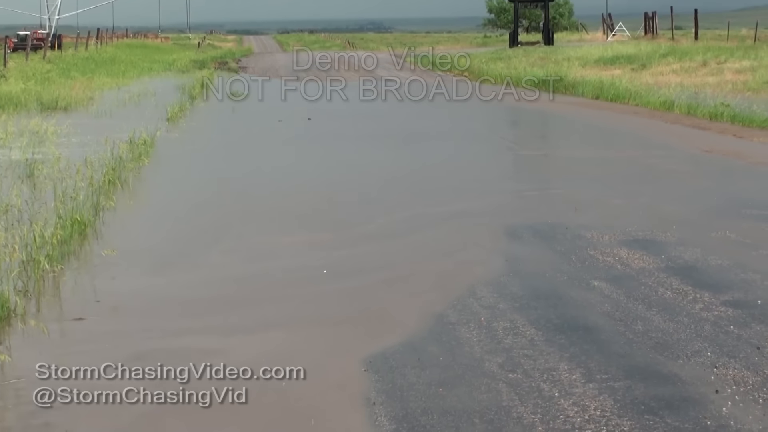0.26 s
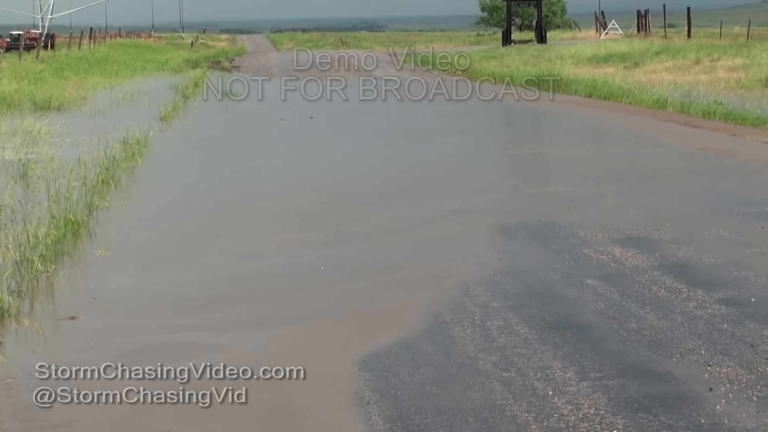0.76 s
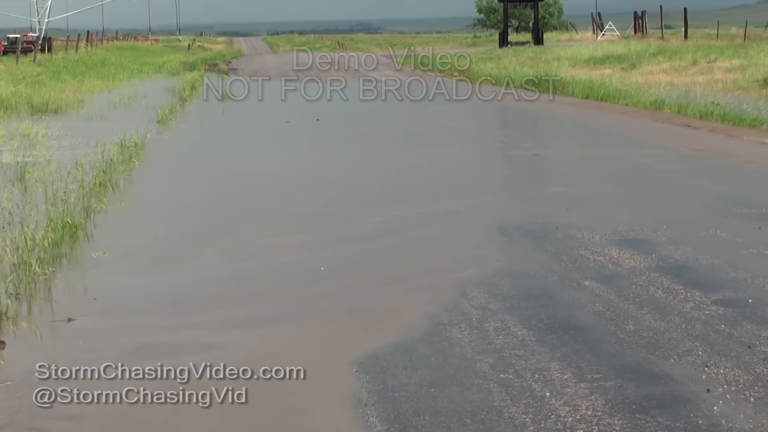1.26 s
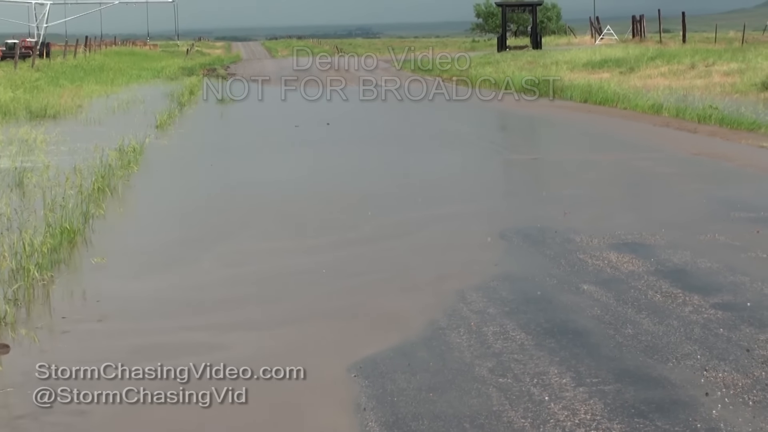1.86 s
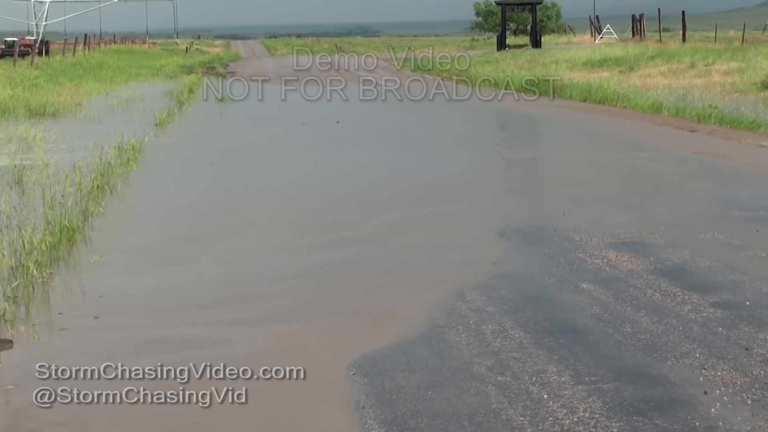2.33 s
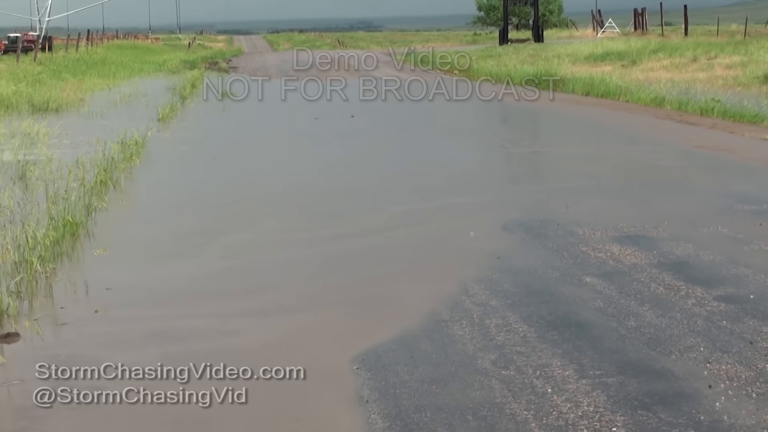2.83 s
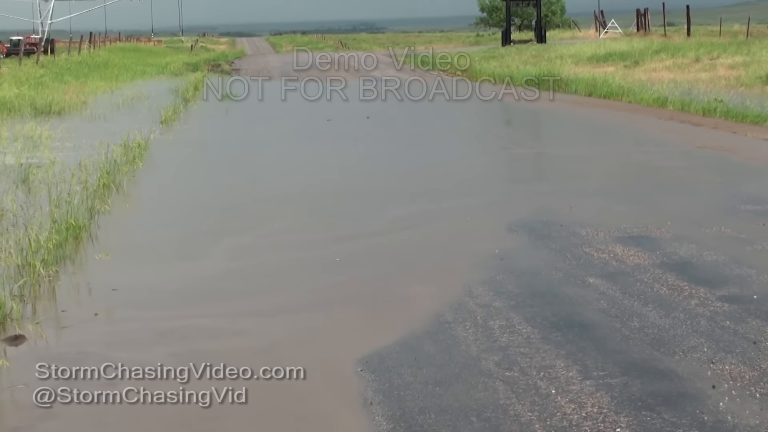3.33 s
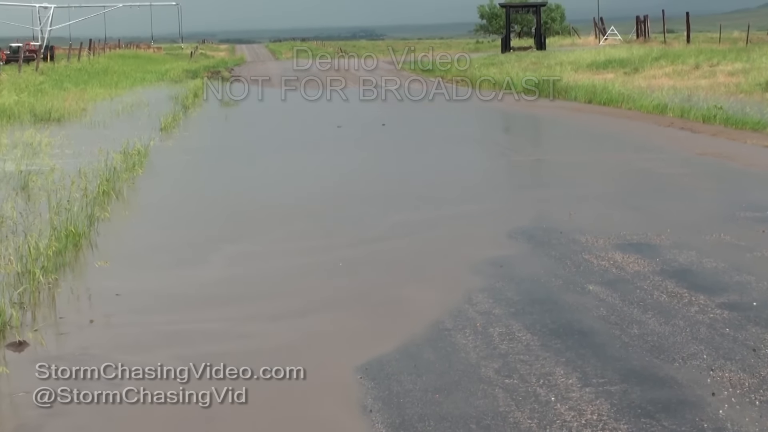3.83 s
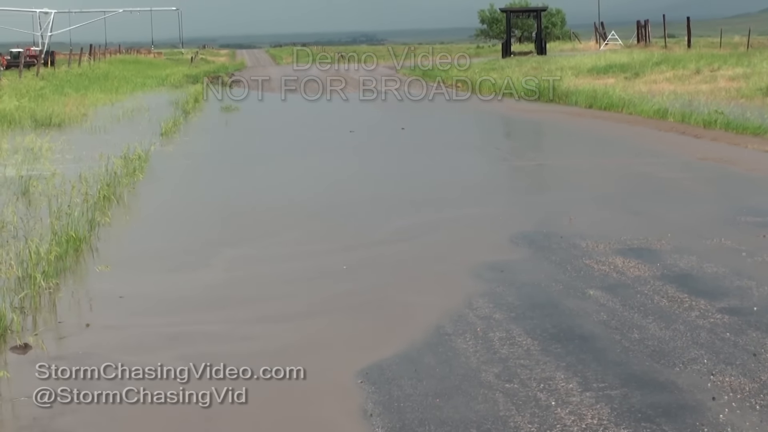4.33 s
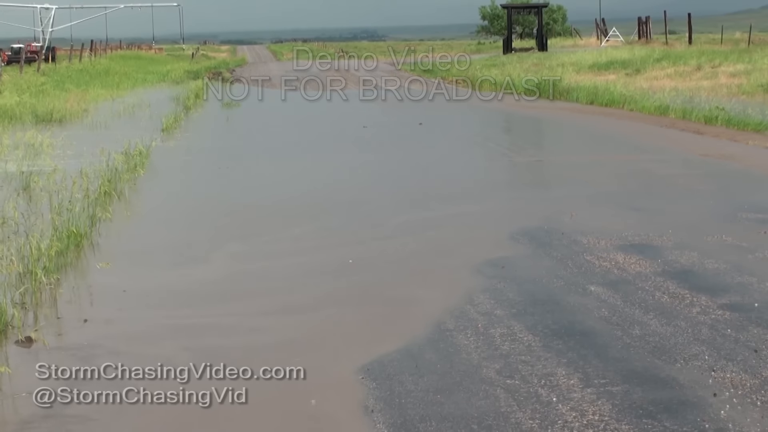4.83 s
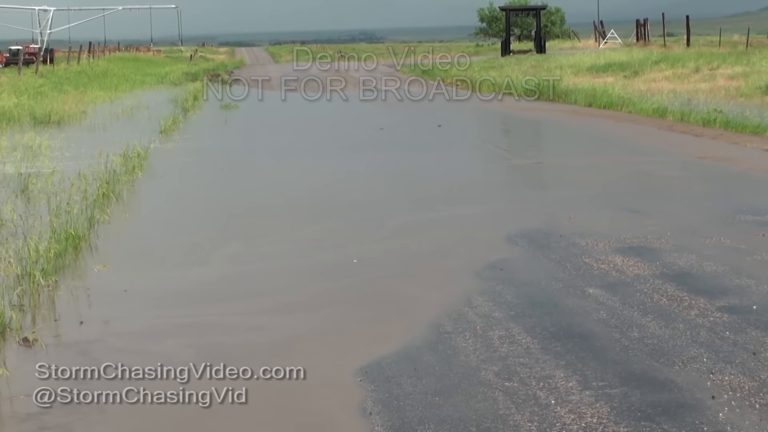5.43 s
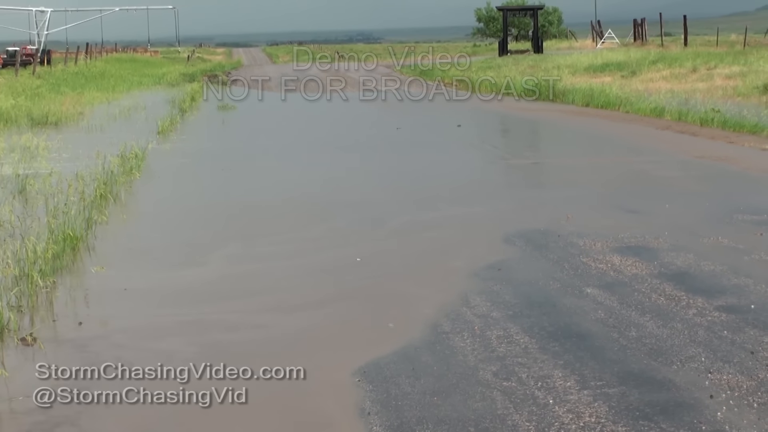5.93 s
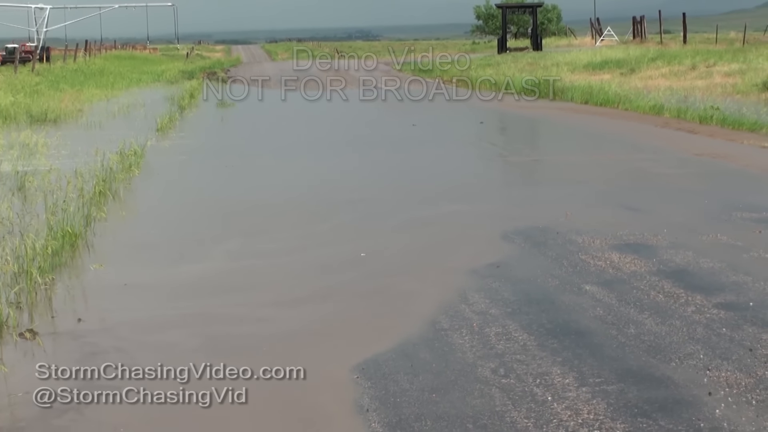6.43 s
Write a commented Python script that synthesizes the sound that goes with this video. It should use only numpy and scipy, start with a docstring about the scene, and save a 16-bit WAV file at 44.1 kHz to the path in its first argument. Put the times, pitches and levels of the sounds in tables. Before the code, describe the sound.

Low, muffled thunder rolls and fades, then cracks up louder in a cluster of deep thumps, over soft hiss, faint drips and a far bird.

```python
"""Distant thunder rolls over a flooded country road: shock waves from many bends of the lightning channel
arrive in overlapping swarms, dulled by kilometres of air, deep and bright parts from different sides.
Noise and random impulses, shaped in six registers, make the roll; dying sines make the claps that stand out.
A songbird of gliding sines sings far off, drops tick faintly on the water as short sine bursts,
the recorder's housing clicks twice as a set of ringing modes, and filtered noise hisses throughout."""
import sys
import numpy as np
from scipy import signal
from scipy.fft import rfft, irfft, next_fast_len
from scipy.io import wavfile
from scipy.ndimage import uniform_filter1d

SR = 44100
rng = np.random.default_rng(int(sys.argv[2]) if len(sys.argv) > 2 else 0)


def unload_wav(signal):
    """Save mono or channel-first audio to the path in sys.argv[1] as 16-bit WAV at rate SR, clipped to [-1, 1]."""
    wavfile.write(
        sys.argv[1],
        SR,
        np.round(np.clip(np.atleast_2d(signal).T, -1, 1) * 32767).astype(np.int16),
    )


N = 294499

# centres of the six thunder registers: (frequency [Hz])
REGISTERS_HZ = [58, 125, 235, 440, 780, 1300]


def from_db(db):
    """Level as a logarithm of amplitude: 20 dB is a factor of ten."""
    return 10 ** (np.asarray(db) / 20)


def rms_one(x):
    """Normalisation to unit mean power."""
    return x / np.sqrt(np.mean(x ** 2) + 1e-20)


def at_hz(points, hz):
    """Interpolation along a logarithmic frequency axis, on which octaves are equally wide."""
    corner_hz, values = np.array(points).T
    return np.interp(np.log(hz), np.log(corner_hz), values)


def coloured(x, gain_of_hz):
    """Linear filtering: each spectral component is multiplied by the gain at its frequency."""
    size = next_fast_len(N)
    hz = np.maximum(np.arange(size // 2 + 1) * SR / size, 1)
    return irfft(rfft(x, size) * gain_of_hz(hz), size)[..., :N]


def sides(x, pan_db):
    """Localisation by level difference: left exceeds right by pan_db."""
    return x * from_db(np.array([[.5], [-.5]]) * pan_db)


def burst(out_len, hz, t60):
    """Free damped oscillation: a sine whose level falls 60 dB in t60 seconds."""
    t = np.arange(out_len) / SR
    return np.sin(2 * np.pi * hz * t) * from_db(-60 * t / t60)


def add(out, s, x):
    """Superposition: sound pressures sum, here from s seconds on."""
    i = round(s * SR)
    out[..., i:i + x.shape[-1]] += x[..., :N - i]


def air():
    """Partly coherent noise: far running water and microphone hiss, as a common and an opposed part."""
    # hiss spectrum: (frequency [Hz], relative level [dB])
    hiss_spectrum = [(880, -10), (1500, -6), (1910, -5), (2150, -3.5), (2730, -7.5), (4480, -11.5),
                     (9610, -18), (11900, -19), (13500, -8)]
    # share of power common to both sides: (frequency [Hz], left-right likeness [-1 to 1])
    likeness = [(1200, 0.24), (2200, 0.067), (4000, .4), (9000, .5), (11500, 0.89)]
    level_db, top_hz = -59.5, 14070   # level of the common part before the top is cut
    mid, side = rng.standard_normal((2, N))
    mid = coloured(mid, lambda hz: from_db(at_hz(hiss_spectrum, hz)) * np.sqrt(1 + at_hz(likeness, hz)))
    side = coloured(side, lambda hz: from_db(at_hz(hiss_spectrum, hz)) * np.sqrt(1 - at_hz(likeness, hz)))
    hiss = from_db(level_db) * (mid + side * [[1], [-1]]) / np.std(mid)
    return signal.sosfilt(signal.cheby2(12, 60, top_hz, fs=SR, output="sos"), hiss)


def bird():
    """Frequency modulation: gliding whistles with soft ends, fluttering in moving air, then echoed."""
    # notes: (time [s], length [s], first pitch [Hz], last pitch [Hz], level before flutter and echoes [dB])
    notes = [(1.077, 0.013, 2320, 2200, -61.5), (1.519, .02, 2300, 2500, -65),
             (3.018, .03, 2550, 2520, -70), (3.462, 0.029, 2354, 2350, -65),
             (4.968, 0.033, 3700, 3700, -75), (5.051, 0.056, 3590, 3554, -68.5),
             (5.34, .02, 2390, 2300, -70), (5.375, .02, 5000, 5070, -67.5),
             (5.49, 0.032, 4700, 4400, -65.5), (5.54, .025, 5100, 4800, -70),
             (5.545, .012, 3240, 2920, -67), (5.678, 0.023, 5450, 5200, -76), (5.73, .02, 4250, 4300, -69),
             (5.745, 0.027, 4800, 3700, -69), (5.77, 0.012, 3650, 3130, -61),
             (5.776, 0.016, 3070, 2730, -63), (5.802, 0.049, 3170, 3100, -60),
             (6.002, 0.016, 2270, 2280, -66), (6.026, .018, 4180, 3930, -66),
             (6.05, 0.018, 3270, 3300, -68), (6.114, 0.018, 2580, 2640, -68),
             (6.127, 0.016, 2900, 3330, -68), (6.16, .025, 2210, 2250, -63), (6.19, .035, 2380, 2260, -63),
             (6.195, .14, 2330, 2220, -72)]
    # reflections off the ground and slopes: (delay [s], level [dB])
    echoes = [(.011, -6), (.027, -20), (.048, -17.5)]
    flutter_db, flutter_hz = 1.5, 120   # rms depth, upper rate
    song = np.zeros(N)
    for s, length, first_hz, last_hz, db in notes:
        n = int(length * SR)
        phase = 2 * np.pi * np.cumsum(np.linspace(first_hz, last_hz, n)) / SR
        soft_ends = np.sin(np.linspace(0, np.pi, n)) ** 0.47
        add(song, s, from_db(db) * np.sqrt(2) * np.sin(phase) * soft_ends)
    slow = signal.butter(2, flutter_hz, fs=SR, output="sos")
    flutter = rms_one(signal.sosfilt(slow, rng.standard_normal(N)))
    song = song * from_db(flutter_db * flutter)
    return song + sum(from_db(db) * np.roll(song, int(lag * SR)) for lag, db in echoes)


def drops():
    """Damped oscillation: each drop is a soft-edged tick of a few cycles; faint ones fall at random."""
    # clear drops: (time [s], level before rise and decay [dB], pitch [Hz])
    clear = [(0.322, -47, 5300), (0.368, -51, 5200), (1.13, -46, 5800), (3.03, -49, 9000),
             (3.172, -46, 5760), (3.327, -46, 8500), (3.883, -48, 4350), (4.055, -49, 5300),
             (5.132, -43.5, 5360), (5.93, -46.5, 4200), (6.296, -51, 3100), (6.469, -39, 11500),
             (6.62, -47, 2700)]
    faint_per_s, faint_db, faint_spread_db = 25, -56, 2.2   # lowest level, mean excess above it
    chance = rng.random((int(faint_per_s * N / SR), 3))
    faint = [(s * N / SR, faint_db - faint_spread_db * np.log(size), 1800 * 3 ** pitch)
             for s, size, pitch in chance]
    out = np.zeros(N)
    for s, db, hz in [*clear, *faint]:
        rise = 1 - np.exp(-np.arange(400) / SR * hz * 3.0)
        add(out, s, from_db(db) * rise * burst(400, hz, 12.0 / hz))
    return out


def housing():
    """Modal resonance: each click rings the same plastic modes, dull or bright, under a snap of noise."""
    # clicks: (time [s], peak level of the modes [dB], factor on ring times [0-1],
    #          brightness [dB/octave], left minus right [dB])
    clicks = [(4.7134, -14, 1.0, 1.5, -2.5), (4.7142, -21, 1, 1.5, 5), (4.7155, -25.5, 1, -16.5, 8.5),
              (6.1017, -44.5, 0.3, 20, .3), (6.1047, -23.5, 0.37, 11, 2.5)]
    # plastic modes: (frequency [Hz], relative level [dB], full ring time to -60 dB [s])
    plastic_modes = [(695, -26, 0.023), (1806, -17, 0.033), (2630, -15, 0.015), (3600, -26, .01),
                     (4610, -6, 0.0076), (5390, 3, 0.0082), (6950, 6, 0.0063), (8660, -6.5, 0.024),
                     (9040, -1.5, 0.014), (10500, 3, 0.0016), (11400, -5, 0.0097), (12500, -3.5, 0.0038),
                     (13500, -17, .007), (14290, -11, 0.0076)]
    snap_db, snap_t60_s = -10, 0.012   # relative to the modes' peak; decay at full ring
    out, t = np.zeros((2, N)), np.arange(SR // 10) / SR
    for s, db, ring, tilt_db, pan_db in clicks:
        modes = np.zeros(len(t))
        for k, (hz, level_db, t60) in enumerate(plastic_modes):
            height = from_db(level_db + tilt_db * np.log2(hz / 8000))
            modes += (-1) ** k * height * burst(len(t), hz, ring * t60)
        edge_hz = np.clip(1400 * 2 ** (tilt_db / 4), 300, 12000)   # a bright click has a thin snap
        high_pass = signal.butter(2, edge_hz, "high", fs=SR, output="sos")
        snap = signal.sosfilt(high_pass, rng.standard_normal(len(t)))
        snap = from_db(snap_db - 60 * t / (ring * snap_t60_s)) * snap
        add(out, s, sides(from_db(db) * (modes / np.max(np.abs(modes)) + snap), pan_db))
    return out


def claps():
    """Damped oscillation: a strong shock through the ground echo gives a few quickly dying swings."""
    # claps that stand out of the roll: (time [s], level before rise and decay [dB], pitch [Hz],
    #                                    clear swings [count], left minus right [dB])
    strong_shocks = [(0.681, -15, 149, 6.5, -9), (1.576, -31, 800, 9.6, 8), (1.661, -24, 147, 6.2, -16),
                     (1.924, -25, 400, 16, 11), (1.938, -28.5, 770, 14, 10), (2.302, -16, 212, 4.1, 6),
                     (2.304, -22.5, 510, 4.5, 13), (2.581, -17.5, 129, 5.7, -4), (2.633, -12, 123, 6.0, -5),
                     (2.794, -27, 560, 14, 8), (2.807, -22, 180, 7.2, 9), (4.734, -5, 189, 8.1, 1),
                     (4.735, -22, 68, 3.5, -3), (4.863, -7, 239, 6.5, 3), (4.919, -7, 170, 5.4, 1),
                     (5.066, -6.5, 236, 3.3, 1.5), (5.138, -7, 242, 7.6, 4), (5.277, -16, 170, 5, 1),
                     (5.486, -14.5, 300, 5.9, 6)]
    out = np.zeros((2, N))
    for s, db, hz, swings, pan_db in strong_shocks:
        rise = 1 - np.exp(-np.arange(SR // 10) / SR * hz * 4)
        t60 = 1.8 * swings / hz   # silence comes well after the last clear swing
        add(out, s, sides(from_db(db) * rise * burst(SR // 10, hz, t60), pan_db))
    return out


def peals():
    """Incoherent addition: powers of rising, holding and fading peals sum to a gain per register and side."""
    # one peal per stretch of the channel: (time [s], hold [s], level [dB], fade, sign ignored [dB/s],
    #     brightness [dB/octave], left minus right [dB], narrowness [dB/octave squared])
    stretches = [(-0.053, 0.2, -46.1, 6.0, -13.0, -2.6, -0.1), (-0.05, 2.911, -39.8, 6, 11.8, -5.6, 4.7),
                 (0.463, 0.025, -37.5, 109.0, -10.1, -5.5, 0.5),
                 (0.615, 0.245, -30.7, 196.0, -6.5, -5.5, -0.7),
                 (0.822, 0.285, -28.5, 13.0, -3.4, -7.1, -0.5),
                 (0.963, 0.122, -31.8, 81.0, -10.2, -3.9, 1.3), (1.059, 0.02, -49.2, 2.0, 12.9, 2.0, 0.5),
                 (1.251, 0.185, -36.7, 52.0, -11.5, -4.1, 0.4),
                 (1.575, 0.139, -31.9, 78.0, -8.5, -5.0, -0.9), (1.77, 0.017, -34.4, 13.0, -7.4, -4.5, 0.6),
                 (1.883, 0.007, -33.1, 209.0, 10.4, 5.5, 0.5), (1.986, 0.016, -40.6, 61.0, 9.1, 1.3, -0.6),
                 (2.178, 0.083, -34.7, 51.0, 5.0, 3.5, -0.8), (2.556, 0.112, -31.3, 85.0, -12.9, -4.3, 3.7),
                 (2.747, 0.009, -29.7, 185.0, 7.2, 4.8, 0.2), (2.776, 0.045, -29.9, 26.0, -5.4, -3.9, -1.4),
                 (2.926, 0.015, -33.7, 170.0, 9.6, 5.0, 1.4), (3.039, 0.4, -37.7, 60.0, 2.1, -8.8, 0.5),
                 (3.173, 0.047, -41.3, 29.0, 6.5, 8.8, 0.2), (3.396, 0.0, -30, 136.0, 1.6, 1.2, -0.9),
                 (3.782, 0.008, -39.4, 26.0, 3.0, -0.2, -0.7), (3.971, 0.053, -41.9, 57.0, -10.2, -2.5, 2),
                 (4.315, 0.669, -39.7, -1, 0.9, -0.9, -1.7), (4.722, 0.0, -22.9, 69.0, -2.4, 1.1, -1.0),
                 (4.868, 0.01, -23.2, 41.0, -2.6, 0.4, 0.1), (4.901, 0.05, -35.4, 5.0, 7.6, 2.3, -0.5),
                 (5.023, 0.087, -23.1, 274.0, -1.5, 0.6, -0.3),
                 (5.209, 0.023, -24.5, 301.0, -3.3, -0.1, -0.7),
                 (5.423, 0.093, -28.8, 60.0, 3.2, 2.3, -1.0), (5.722, 0.01, -44.7, 92.0, -10.7, -0.4, -1.0),
                 (5.882, 0.207, -31.2, 54.0, 4.5, 2.6, -0.3),
                 (6.051, 0.043, -43.2, 120.0, -12.5, -1.5, -0.4),
                 (6.221, 0.05, -31.5, 105.0, 5.0, 3.8, -0.5), (6.498, 0.2, -37.4, 60.0, 3.2, 2.6, -0.1)]
    # each register in a plain peal: (relative level [dB])
    plain_shape_db = [-22.5, -6, -3.6, -10.5, -24.8, -41]
    # steady far rumble in each register: (level [dB])
    bed_db = [-48.5, -47.5, -46.5, -53.5, -58, -60]
    bed_pan_db, rise_s = -.7, 0.052   # left minus right of the rumble; rise time of a peal
    skew_db_per_octave = 0.87   # the microphones hear higher sounds further left
    s, hold, db, fade, tilt, pan, narrow = np.array(stretches).T[:, :, None]
    t = np.arange(0, N / SR + .01, .005)   # 200 steps a second
    fading_s = np.maximum(t - s - rise_s - hold, 0)
    swell = np.clip((t - s) / rise_s, 0, 1) * from_db(db - np.abs(fade) * fading_s)
    octave = np.log2(np.array(REGISTERS_HZ) / REGISTERS_HZ[2])
    skew_db = skew_db_per_octave * octave
    gains = []
    for side in (.5, -.5):
        shape = from_db(plain_shape_db + tilt * octave - narrow * octave ** 2 + side * (pan + skew_db))
        bed = from_db(bed_db + side * (bed_pan_db + skew_db))
        gains.append(np.sqrt((shape ** 2).T @ swell ** 2 + bed[:, None] ** 2))
    seconds = np.arange(N) / SR
    return [np.array([np.interp(seconds, t, g[k]) for g in gains]) for k in range(len(REGISTERS_HZ))]


def roll():
    """Random superposition: uneven shocks mixed with smooth noise, in six registers that swell apart."""
    # thunder spectrum: (frequency [Hz], relative spectral level [dB])
    thunder_spectrum = [(15, -34.5), (25, -18.5), (80, -0.5), (153, 2), (299, -7), (384, -11), (668, -24),
                        (824, -26.5), (1950, -56.5), (2400, -59.5), (3120, -77.5), (5280, -120)]
    # sound scattered unlike to both sides: (frequency [Hz], level relative to the common sound [dB])
    scatter_spectrum = [(60, -22), (250, -16), (600, -7.5), (1500, -8)]
    # bunching of the shocks, plainest in the bright registers: (depth [dB])
    clump_db = [0.33, 0.93, 1.9, 2.17, 2, 2.1]
    shocks_per_s, shock_spread_db, shock_share = 600, 2.5, 0.42   # share of power, the rest is smooth noise
    clumps_per_s = 15.1   # fastest bunching
    # slow level swings of the noise are partly evened, so the peals shape the roll
    even_cycles, even_share = 7, .6
    sizes = from_db(shock_spread_db * np.minimum(rng.exponential(1, N), 5)) * rng.choice([-1, 1], N)
    shocks = rms_one(sizes * (rng.random(N) < shocks_per_s / SR))
    smooth = rng.standard_normal(N)
    common = np.sqrt(shock_share) * shocks + np.sqrt(1 - shock_share) * smooth
    scattered = coloured(rng.standard_normal(N), lambda hz: from_db(at_hz(scatter_spectrum, hz)))
    slow = signal.butter(2, [clumps_per_s / 5, clumps_per_s], "band", fs=SR, output="sos")
    slow_noise = signal.sosfilt(slow, rng.standard_normal((len(REGISTERS_HZ) + 1, N)))
    clumps = [rms_one(c) for c in slow_noise]
    out = 0
    for k, gain in enumerate(peals()):
        weight = list(zip(REGISTERS_HZ, np.eye(len(REGISTERS_HZ))[k]))   # fades into its neighbours
        mid, side = coloured(np.array([common, scattered]),
                             lambda hz: at_hz(weight, hz) ** 1.186 * from_db(at_hz(thunder_spectrum, hz)))
        side, mid = side / np.std(mid), rms_one(mid)
        span = int(even_cycles / REGISTERS_HZ[k] * SR)
        power = uniform_filter1d(uniform_filter1d(mid ** 2, span), span // 2) + 1e-3
        # neighbouring registers share one of their two bunchings
        bunching = from_db(clump_db[k] * (0.58 * clumps[k] + 0.61 * clumps[k + 1]))
        mid = rms_one(mid * power ** (-even_share / 2) * bunching)
        out = out + gain * (mid + side * [[1], [-1]])
    return out


def scene():
    """Superposition of all sources, the bird 1.5 dB stronger on the left."""
    return air() + sides(bird(), 1.5) + drops() + housing() + claps() + roll()


def record(dry):
    """Band limitation: a steep low-pass removes the top above 14.9 kHz."""
    return signal.sosfilt(signal.ellip(8, .5, 70, 14900, fs=SR, output="sos"), dry)


dry = scene()
out = record(dry)
unload_wav(out)
```